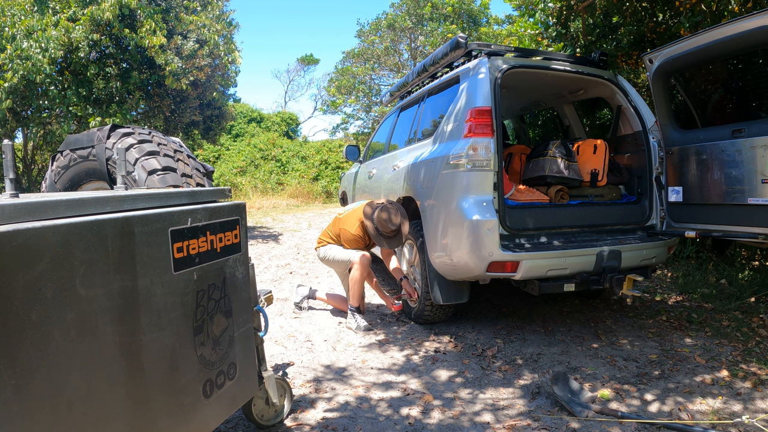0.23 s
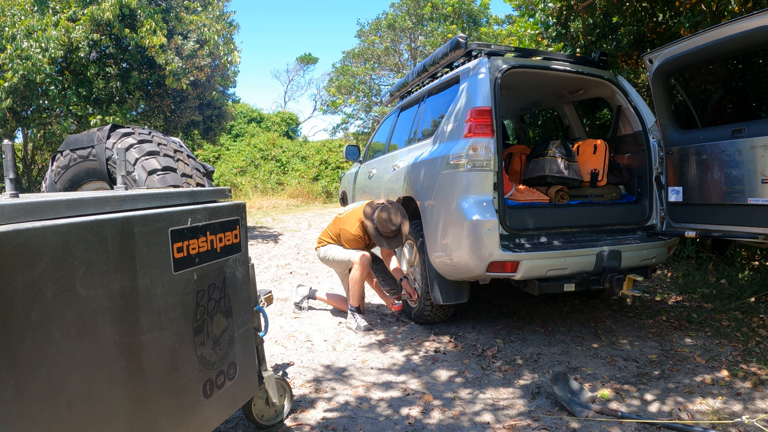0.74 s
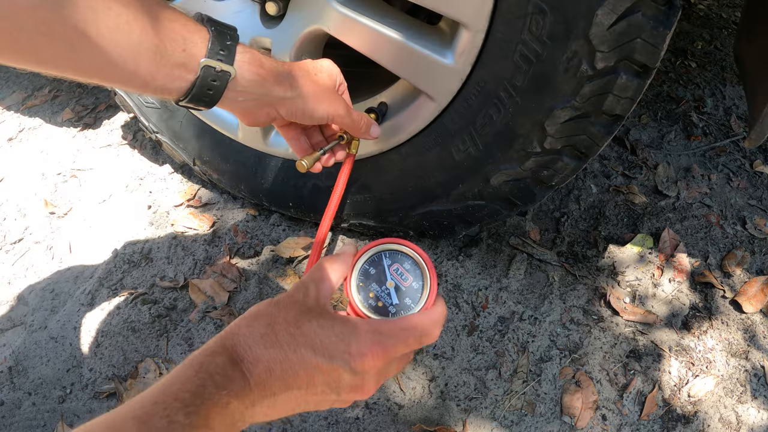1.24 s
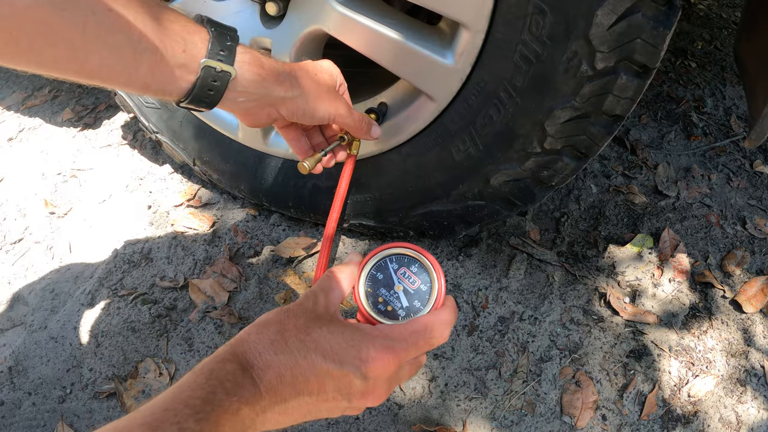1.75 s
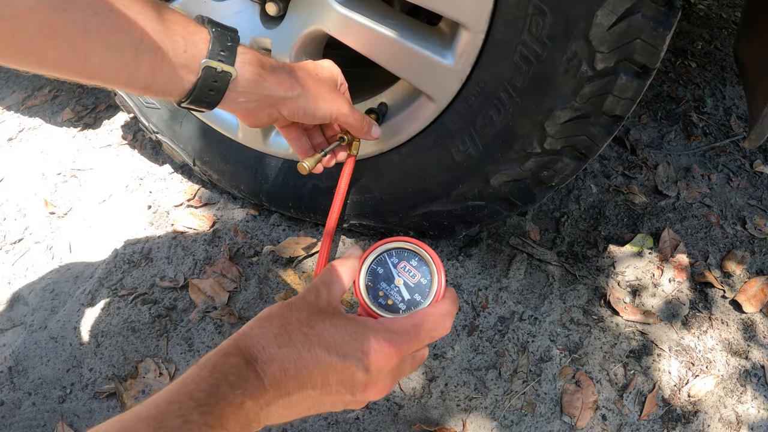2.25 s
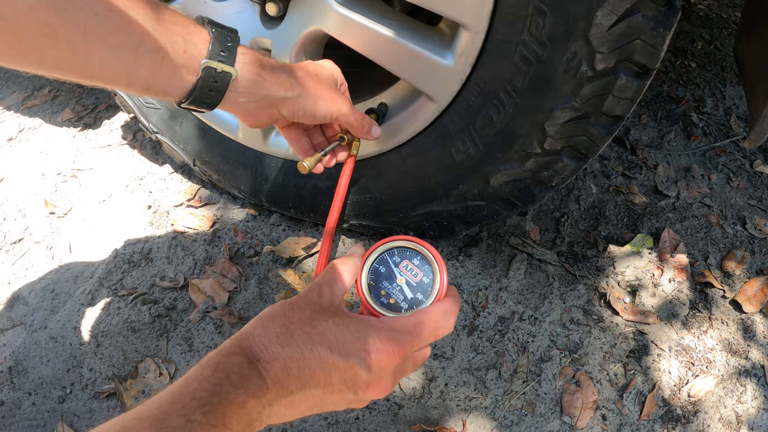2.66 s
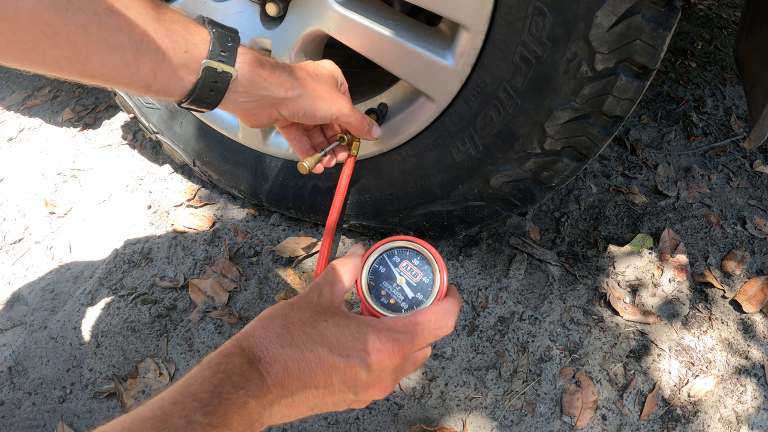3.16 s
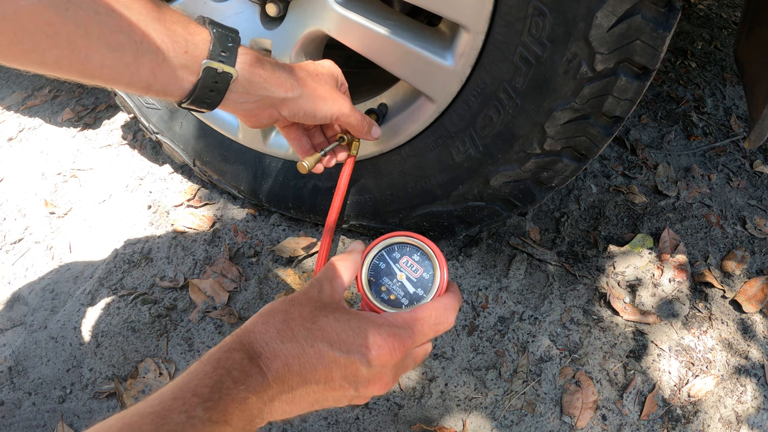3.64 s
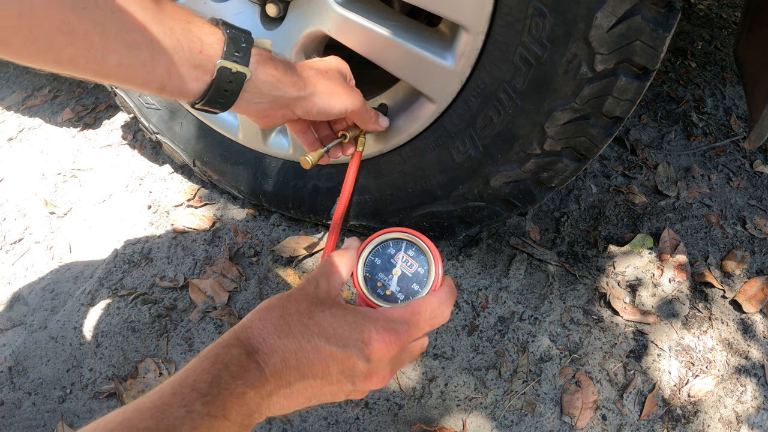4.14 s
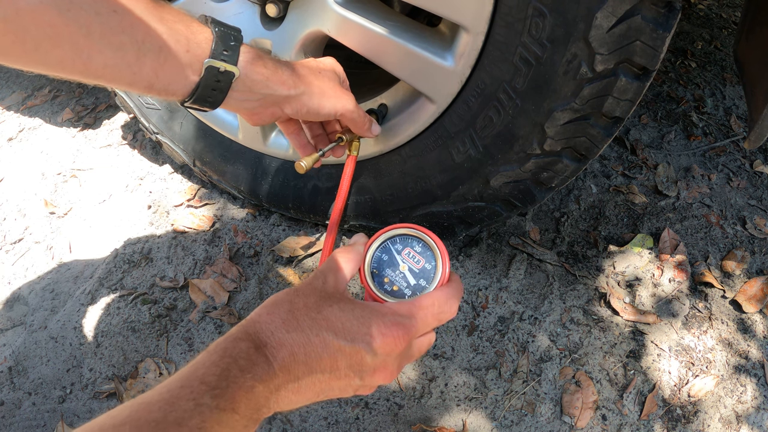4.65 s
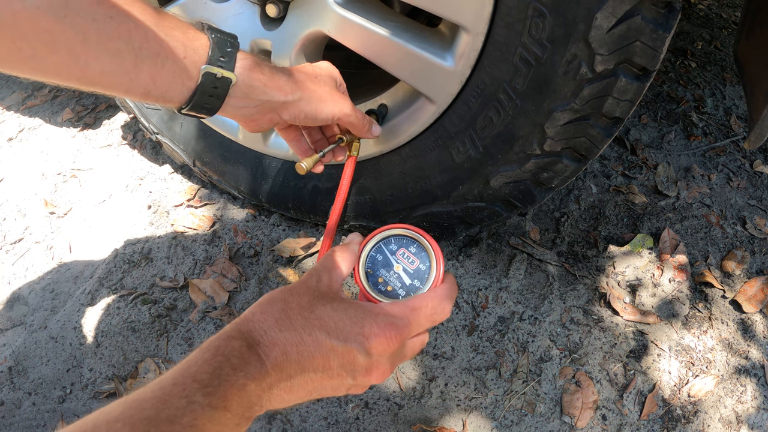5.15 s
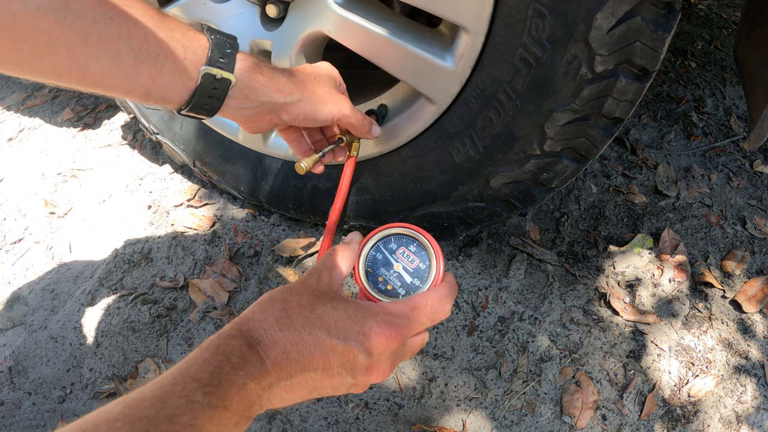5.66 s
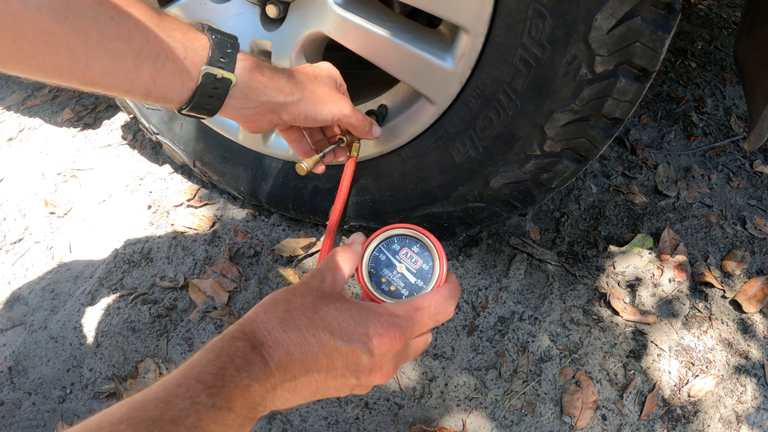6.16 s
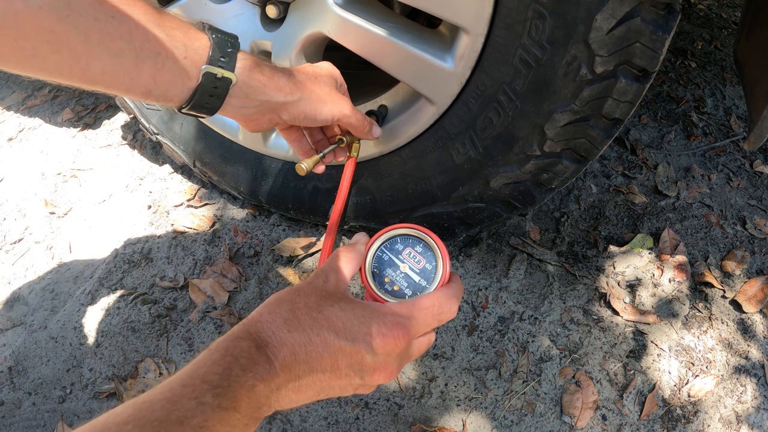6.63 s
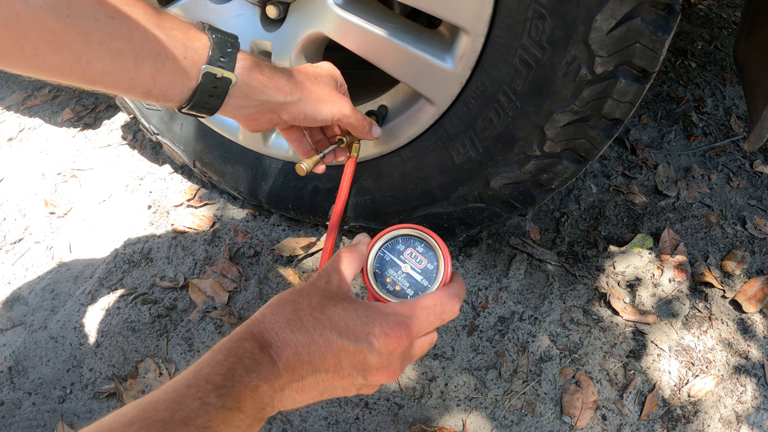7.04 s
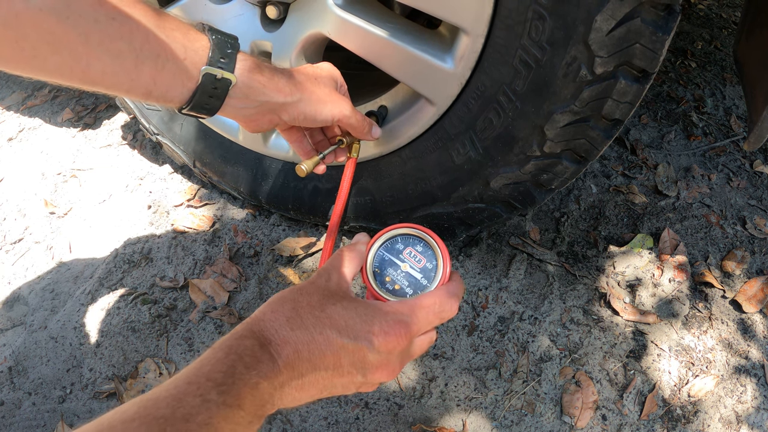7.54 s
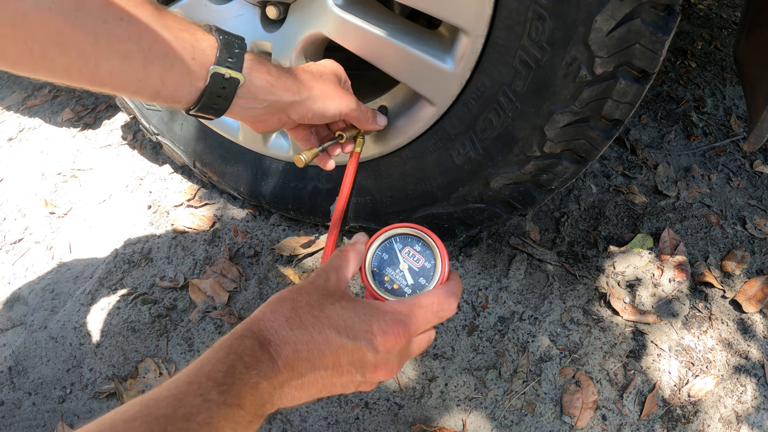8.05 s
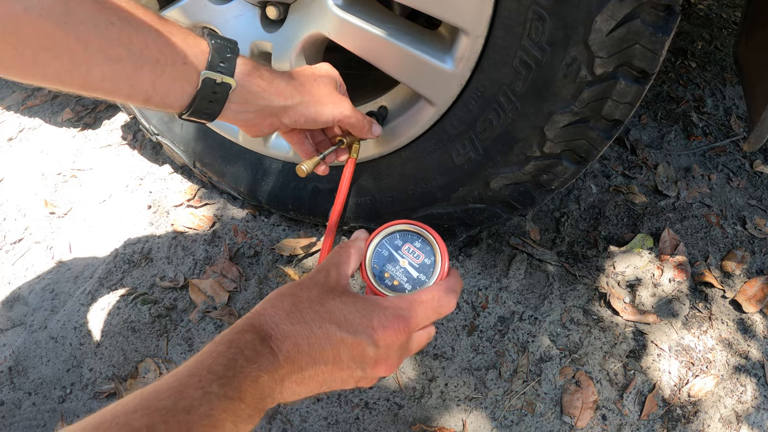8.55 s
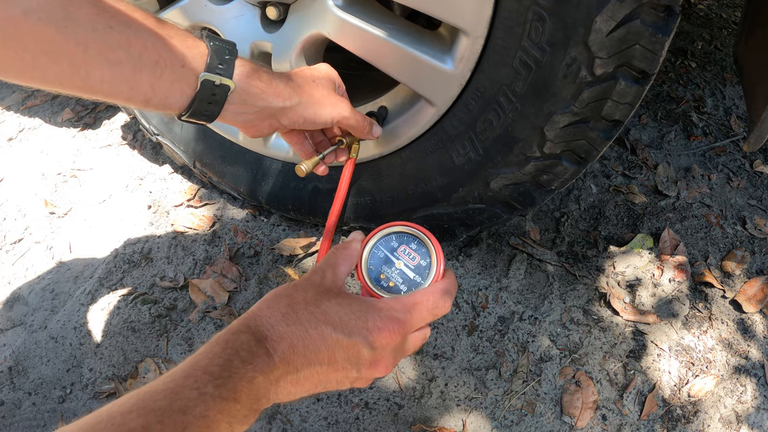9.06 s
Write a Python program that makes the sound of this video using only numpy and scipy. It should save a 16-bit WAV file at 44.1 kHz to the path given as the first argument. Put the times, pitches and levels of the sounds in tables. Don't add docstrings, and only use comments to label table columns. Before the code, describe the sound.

A strong continuous jet of tyre air, harsh and fizzy with a hollow metallic colour, wavers slightly as a hand shifts. Two brief shut-offs expose quiet outdoor wash and tiny fitting rings; each reopening spits sharply back to full force. Wind bumps a small, close outdoor microphone, then dies down. The sound is mostly centred, its highest hiss widening later on.

```python
import sys
import numpy as np
from scipy import signal
from scipy.fft import rfft, irfft
from scipy.io import wavfile
from scipy.ndimage import uniform_filter1d

SR = 44100
rng = np.random.default_rng(int(sys.argv[2]) if len(sys.argv) > 2 else 0)


def transcribe(signal):
    frames = np.atleast_2d(signal).T
    limited = np.clip(frames, -1, 1)
    pcm = np.round(limited * 32767).astype(np.int16)
    wavfile.write(sys.argv[1], SR, pcm)


def rack_gain(trim_db):
    fader = np.asarray(trim_db, float)
    return 10 ** (fader / 20)


N = 410130
TIME = np.arange(N) / SR
HZ = np.fft.rfftfreq(N, 1 / SR)


def evened(x):
    return x / np.sqrt(np.mean(x ** 2) + 1e-20)


def along_time(rows, index=1):
    rows = np.array(rows, float)
    return np.interp(TIME, rows[:, 0], rows[:, index])


def along_hz(rows, index=1):
    rows = np.array(rows, float)
    return np.interp(np.log(HZ + 1), np.log(rows[:, 0] + 1), rows[:, index], -120, -120)


def coloured(x, colour_db):
    return irfft(rfft(x) * rack_gain(colour_db), N)


def eddies(flicker_db, life_s):
    size = max(round(life_s * SR), 1)
    wander = rng.standard_normal(N)
    for _ in range(2):
        wander = uniform_filter1d(wander, size)
    return rng.standard_normal(N) * rack_gain(flicker_db * evened(wander))


def echoes():
    t = np.arange(1500) / SR
    sparse = rng.standard_normal(1500) * (rng.random(1500) < .05)
    taps = sparse * rack_gain(-60 * t / .04) * (t > .004)
    treble = HZ ** 2 / (HZ ** 2 + 2500 ** 2)
    return 1 + rack_gain(-13) * rfft(taps / np.linalg.norm(taps), N) * treble


# start_s, body_db, fizz_db
PRESSURE = [(0, -14.5, -14), (.6, -14.5, -13.5), (2, -14, -13.5), (4.1, -14, -13), (5.1, -15, -13.5),
            (7, -14, -13), (7.9, -15.5, -13.5), (9.3, -16, -14.5)]
# lowest_s, sag_s, sag_db, rebound_db
WAVERS = [
    (0.434, 0.11, -2.5, 1.2),
    (0.715, 0.068, -1.5, -0.5),
    (1.238, 0.062, -2, 1),
    (4.592, 0.022, -1.5, 0.5),
    (6.134, .1, -.5, 0.7),
    (6.397, .1, -0.5, -1),
    (7.292, 0.16, -2, 1),
    (9.084, 0.1, -1, 0.9),
]


def open_flow():
    spring_s, settle_s = 0.045, 0.15
    sway_db = 0
    for lowest_s, sag_s, sag_db, rebound_db in WAVERS:
        knots_s = np.cumsum([lowest_s - sag_s, sag_s, spring_s, settle_s])
        sway_db = sway_db + np.interp(TIME, knots_s, [0, sag_db, rebound_db, 0])
    return along_time(PRESSURE, 1) + sway_db, along_time(PRESSURE, 2) + 1.15 * sway_db


# pitch_hz, density_db_per_hz
JET = [(420, -18.5), (600, -13), (1100, -4.5), (1600, -8), (2000, 0), (2600, -7), (3200, -10.5),
       (3750, -13), (4400, -7.5), (5600, -4.5), (7500, -5.5), (9400, -9), (10300, -17.5), (11500, -26.5)]
# pitch_hz, width_hz, grip1_db, grip2_db, grip3_db, grip4_db
RINGS = [(677, 258, 5, 5, 6, 7), (1162, 47, 3.5, 3.5, 5, 4), (1295, 61, 6.5, 4.5, 2.5, 0.5),
         (1420, 120, 6.5, 7.5, 7, 5.2), (1716, 332, 9.5, 10, 7, 5), (1919, 95, 5, 4.5, 4, 4.5),
         (2150, 94, 5, 6, 5, 2), (2332, 216, 6.5, 8.5, 7.5, 4.8), (2870, 240, 3, 5, 4.5, 2.5),
         (3340, 180, 4.5, 1.5, 0.5, 2.5), (3930, 120, 2.5, 4, 4.5, 2.2), (4190, 79, 1, 8, 5.5, 2),
         (4600, 230, 4, 1.5, 3, 0), (5020, 200, 6.5, 6.5, 2.5, 1.5), (5230, 120, 5, 5.5, 4, -0.0),
                (5480, 340, 4, 5, 5.2, 4), (5844, 310, 7, 5, 5.5, 5), (6080, 140, -8, -7.5, 1, 4.5),
                (6295, 530, 7, 5, 1.5, 0.5), (6840, 330, 4.5, 4.5, 6, 3),
         (7250, 140, 3.5, 0.5, 4.5, 1), (7220, 250, 1.5, 3, 1, 0.5), (7530, 200, 3, 2, 6, 4),
              (8060, 260, 5.5, 3, 5.5, 5), (8290, 210, 4, 7.5, 3, 1), (8660, 250, 4, 3.5, 9.5, 6.5),
              (9050, 180, 3.5, 5, -0.5, 4.5), (9240, 270, 6, 3.5, 8.5, 4.5), (9580, 170, 6, 6.5, 6, 5),
              (9730, 240, -1, -3, 4.5, 3)]
# pitch_hz, width_hz, grip1_db, grip2_db, grip3_db, grip4_db
RIM_DIPS = [(4350, 300, -3, -.5, -1, -1), (3690, 259, 1.5, 0, -2.5, -6), (2690, 180, -0.92, -1, -4.5, -7)]
GRIPS = [
    .95,
    4.35,
    8.1,
]


def jet():
    rows = RINGS + RIM_DIPS
    pitch_hz, width_hz, *grips_db = np.transpose(rows)
    coarse_hz = HZ[::64]
    bells = np.exp(-4 * np.log(2) * ((coarse_hz[:, None] - pitch_hz) / width_hz) ** 2)
    colours = [rack_gain(np.interp(HZ, coarse_hz, bells @ lift_db)) * echoes() for lift_db in grips_db]

    low = 1 / (1 + (HZ / 4300) ** 14)
    cavity = 1 / (1 + (HZ / 2600) ** 14) / (1 + (1500 / (HZ + 1)) ** 14)
    fade = np.clip((11500 - HZ) / 900, 0, 1)
    source = fade * rack_gain(along_hz(JET))
    edges_s = [-1] + list(GRIPS) + [99]
    parts = []
    for share, flicker_db, life_s in ((low, .7, .006), (1 - low, .6, .003)):
        drive = rfft(eddies(flicker_db, life_s)) * np.sqrt(share) * source
        part = 0
        for colour, from_s, to_s in zip(colours, edges_s[:-1], edges_s[1:]):
            held = np.clip((TIME - from_s) / .2, 0, 1) - np.clip((TIME - to_s) / .2, 0, 1)
            part = part + held * evened(irfft(drive * colour, N))
        parts.append(part)
    body, fizz = parts
    core = irfft(rfft(body) * cavity, N)
    return core, body - core, fizz


# pitch_hz, density_db_per_hz
TOP = [(9500, -29), (10500, -3.5), (11300, 4), (11800, -3), (12600, -6), (13500, -11), (14000, -14),
       (14800, -12), (15300, -19), (15800, -17.5)]
# pitch_hz, left_db, right_db
PORTS = [(10500, -32, -30), (11200, -21, -15), (12000, -11, -6), (12700, -13, -1.5), (13100, -6, -6.5),
         (14000, -14, -11), (15000, -12, -16.5), (15800, -18, -14)]
# start_s, level_db
OPENING = [(5.3, -87), (5.45, -36), (5.8, -29), (6.5, -28), (7.2, -22), (7.9, -19), (8.3, -13), (9.3, -11)]


def jet_top():
    mono = coloured(eddies(.6, .004), along_hz(TOP))
    mono = rack_gain(-26.5) * evened(irfft(rfft(mono) * echoes(), N))
    left, other = eddies(1.5, .01), eddies(1.5, .01)
    right = -.2 * left + other
    pair = np.array([coloured(left, along_hz(PORTS, 1)), coloured(right, along_hz(PORTS, 2))])
    return mono + rack_gain(along_time(OPENING)) * evened(pair)


# start_s, thud_db, rumble_db
BREEZE = [(0, -34, -35), (1.2, -32.5, -33), (2.6, -36, -34.5), (4.2, -40, -34.5), (5.3, -39.5, -38.5),
          (6, -47, -39), (7.6, -41.5, -42), (9.3, -44, -44)]
# start_s, level_db
BUFFET_DB = [(0, -32.5), (4.2, -35.5), (4.6, -33), (9.3, -34)]
# centre_s, length_s, thud_lift_db, rumble_lift_db, buffet_lift_db
GUSTS = [(0, .2, 9, 0, 9), (0.414, 0.41, 9, 11, 2.5), (.57, .14, 8, 3, 3), (.72, .4, 8, 8, 2),
         (1.117, 0.26, 2, 3.5, 1), (1.397, .15, 3, 0, -1), (1.57, .2, -7, -2, -5.5),
         (1.74, 0.16, 17.5, 9, -3.5), (2.05, 0.43, 9, 4.5, -3), (2.4, .4, 3, -1, -1.5),
         (2.7, .25, -2, 3, -2), (3.502, 0.78, 2, 5.5, 0), (3.902, 0.45, 7, 5.5, -1),
         (4.14, 0.3, 1, 4.5, -.3), (4.65, .4, -1, 3, 3.5), (5.15, .3, 0.3, 4.5, -0.5),
         (7.15, .3, 3, -5, 1.5), (7.4, .3, 2, 3, 2), (8.08, .16, 0.5, -6, 1), (8.22, .14, 7, 9, 3),
         (8.5, 0.56, -3, 4, 1), (8.9, 0.23, 0.3, -2, -1), (9.1, .2, 4, 1, 1.5)]
# pitch_hz, density_db_per_hz
THUD = [(12, -30), (20, 0), (40, 4.5), (60, 4.5), (85, -32)]
# pitch_hz, density_db_per_hz
RUMBLE = [(42, -13), (62, -2.5), (90, -1), (125, -4.5), (170, -22.5)]
# pitch_hz, density_db_per_hz
BUFFET = [(90, -26), (130, 0.5), (190, 3), (250, -1.5), (320, -1.5), (400, -7), (500, -30.5), (700, -35)]


def wind(flow_db):
    centre_s, length_s, *lifts_db = np.transpose(GUSTS)
    phase = np.clip((TIME - centre_s[:, None]) / length_s[:, None], -.5, .5)
    lifts_db = np.array(lifts_db) @ np.cos(np.pi * phase) ** 2
    draught = np.clip(rack_gain(uniform_filter1d(flow_db, 600) + 17), 0, 1)
    still = rack_gain(-46)
    buffet_gain = np.hypot(draught * rack_gain(along_time(BUFFET_DB)), still)
    gains = [rack_gain(along_time(BREEZE, 1)), rack_gain(along_time(BREEZE, 2)), buffet_gain]
    out = 0
    for colour, gain, lift_db in zip((THUD, RUMBLE, BUFFET), gains, lifts_db):
        out = out + gain * rack_gain(lift_db) * evened(coloured(eddies(0.24, 0.018), along_hz(colour)))
    return out


# pitch_hz, density_db_per_hz
WASH = [(90, -22), (150, 2.5), (210, -1), (300, -12), (410, -19.5), (520, -9.5), (680, -14), (1570, -17),
        (2600, -26.5), (3750, -36), (5140, -32), (9500, -49), (11000, -58.5), (14300, -87)]
# start_s, lift_db
WASH_FADE = [(0, 0), (4.3, 5.5), (4.5, 8.5), (8.0, 1.5), (8.3, 5)]


def far_wash():
    noise = evened(coloured(eddies(0.76, .05), along_hz(WASH)))
    return rack_gain(-46 + along_time(WASH_FADE)) * noise


def patchy(x, kept):
    z = signal.stft(x, nperseg=2048)[2]
    keep = rng.random((z.shape[0] // 8 + 1, z.shape[1])) < kept
    keep = np.repeat(keep, 8, axis=0)[:len(z)]
    return signal.istft(z * keep, nperseg=2048)[1][:N]


# start_s, end_s, level_db
PARTINGS = [(0, 0.223, -33), (0.382, 0.483, -33), (0.673, 0.692, -32), (1.735, 1.763, -32),
            (2.117, 2.286, -31.5), (4.153, 4.196, -38), (4.665, 5.473, -32), (7.446, 7.678, -30.5),
            (8.307, 8.437, -39), (8.57, 9.3, -36)]
# pitch_hz, density_db_per_hz
STRAY = [(18, -38), (30, -11), (129, 0.5), (443, -9), (582, -3.5), (1810, -7), (3800, -8.5), (8810, -1),
         (11000, -18), (14300, -51), (22000, -120)]


def stray():
    parting = sum(rack_gain(level_db) * (TIME >= start_s) * (TIME < end_s)
                  for start_s, end_s, level_db in PARTINGS)
    difference = evened(coloured(patchy(rng.standard_normal(N), 0.51), along_hz(STRAY)))
    return uniform_filter1d(parting, 400) * difference


# shut_s, open_s, body_leak_db_per_s, fizz_leak_db_per_s, body_surge_db
VALVE = [
    (4.172, 4.543, 72, 150, 6.5),
    (7.906, 8.321, 139, 196, 4.5),
]


def valve(body_db, fizz_db):
    fall_db_per_s, leak_db, seep_db = (750, 1200), (-38, -34.5), (-70, -75)
    body_lead_s, body_lag_db, catch_up_s, surge_s = 0.013, -6, 0.048, .018
    levels_db = [body_db, fizz_db]
    opening = np.zeros(N, bool)
    for shut_s, open_s, body_rate, fizz_rate, surge_db in VALVE:
        after_s = TIME - open_s
        rise_db = 1299 * np.minimum(after_s, 0)
        late_db = body_lag_db * np.clip(1 - (after_s.clip(0) / catch_up_s) ** 3, 0, 1)
        late_db = late_db + surge_db * np.clip(1 - abs(after_s - surge_s) / surge_s, 0, 1)
        spit_db = 1.5 * np.clip(1 - after_s / .04, 0, 1)
        layers = [(shut_s - body_lead_s, body_rate, late_db), (shut_s, fizz_rate, spit_db)]
        for k, (start_s, rate, extra_db) in enumerate(layers):
            since_s = (TIME - start_s).clip(0)
            falling = rack_gain(-(fall_db_per_s[k] * since_s).clip(0, 200))
            closing = np.minimum(falling, 1 - rack_gain(rise_db.clip(-200)))
            gate = closing + rack_gain((rise_db + extra_db).clip(-200))
            leak = rack_gain((leak_db[k] - rate * since_s).clip(-200)) + rack_gain(seep_db[k])
            leak = leak * (since_s > 0) * (TIME < open_s)
            levels_db[k] = 20 * np.log10(np.hypot(rack_gain(levels_db[k]) * gate, leak))
        opening |= (TIME > open_s - .06) & (TIME < open_s + .06)
    return *levels_db, opening


# start_s, peak_db, pitch_hz, t60_s
TICKS = [
    (4.2, -39, 1800, .12),
    (4.306, -47, 9100, .04),
    (4.309, -49, 8500, .04),
    (4.312, -48, 9500, .03),
    (4.496, -30, 2300, 0.017),
    (4.497, -42, 1500, .01),
    (4.498, -44, 2900, .008),
    (4.548, -22, 150.6, .5),
    (7.94, -33, 1790, .08),
    (8.3, -36, 1950, .05),
]


def ticks():
    out = np.zeros(N)
    for start_s, peak_db, pitch_hz, t60_s in TICKS:
        t = np.maximum(TIME - start_s, 0)
        decay = rack_gain(np.maximum(peak_db - 60 * t / t60_s, -200))
        out += decay * np.sin(2 * np.pi * pitch_hz * t) * np.minimum(t / .002, 1)
    return out


def scene():
    body_db, fizz_db, opening = valve(*open_flow())
    weak_db = np.clip(-24 - body_db, 0, 12)
    skirt_db = body_db + np.where(opening, -1.2, .3) * weak_db
    core_db = body_db - np.where(opening, 0, .3) * weak_db
    core, skirts, fizz = jet()
    hiss = fizz + rack_gain(-.7 * weak_db) * jet_top()
    near = rack_gain(core_db) * core + rack_gain(skirt_db) * skirts + rack_gain(fizz_db) * hiss
    return near + wind(fizz_db) + far_wash() + ticks()


def band_limit(x):
    return signal.sosfilt(signal.butter(12, 15750, fs=SR, output="sos"), x)


def record(dry):
    limited = 1.35 * np.tanh(dry / 1.35 * 1.05)
    side = stray()
    return band_limit(limited + np.array([side, -side]))


dry = scene()
out = record(dry)
transcribe(out)
```